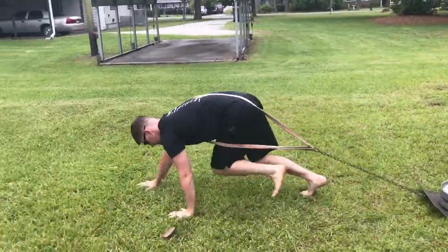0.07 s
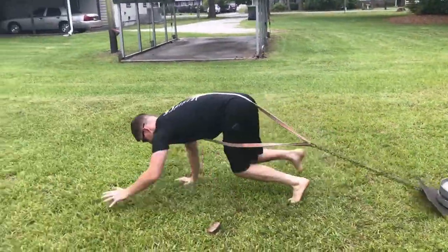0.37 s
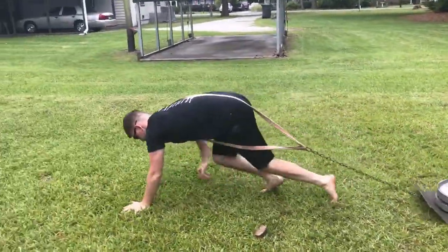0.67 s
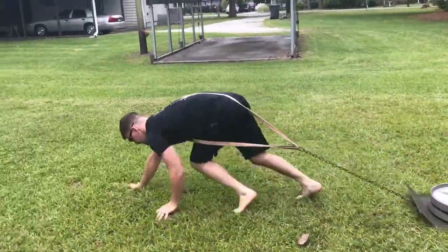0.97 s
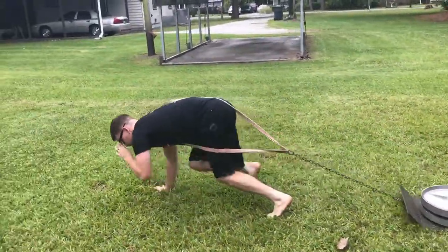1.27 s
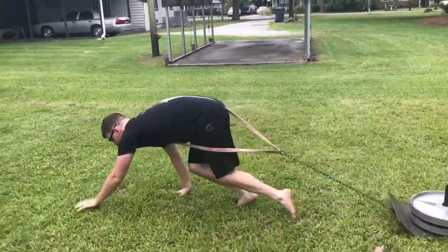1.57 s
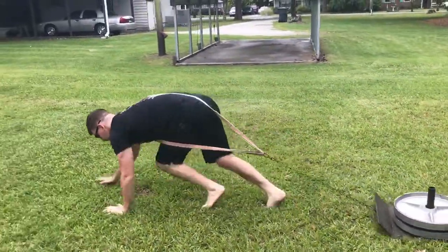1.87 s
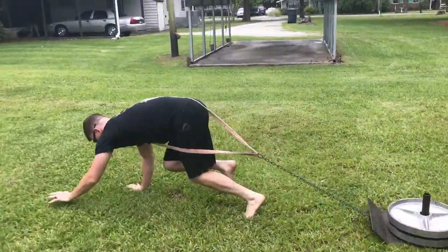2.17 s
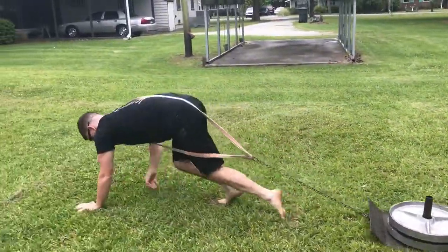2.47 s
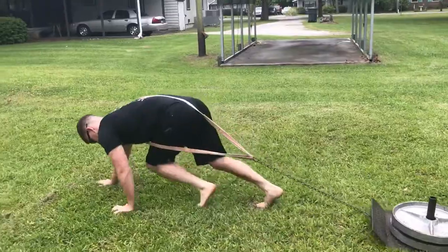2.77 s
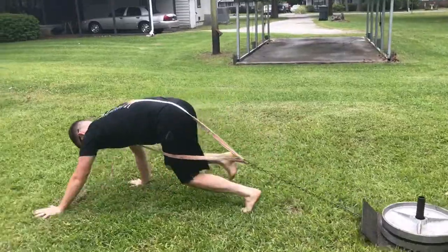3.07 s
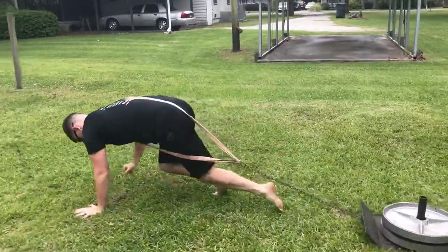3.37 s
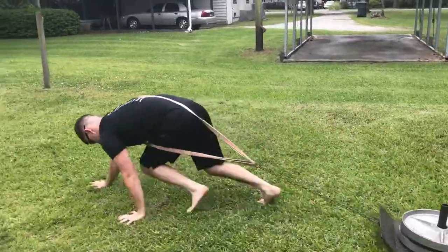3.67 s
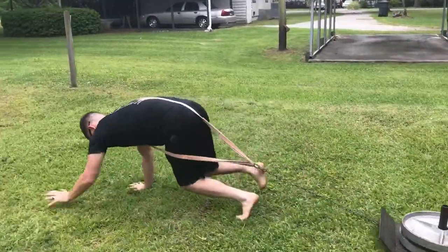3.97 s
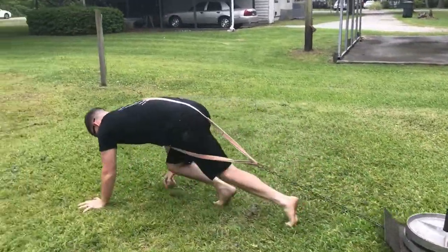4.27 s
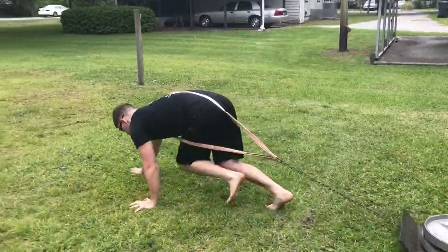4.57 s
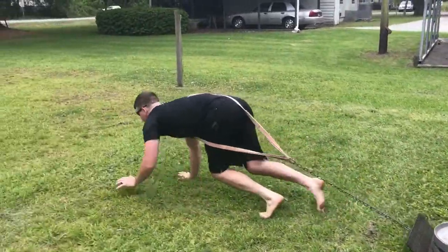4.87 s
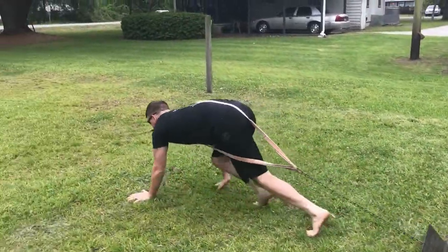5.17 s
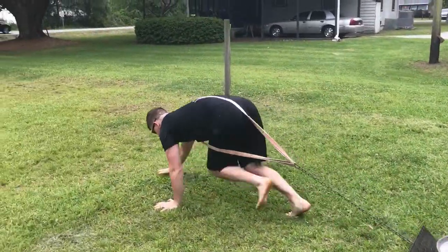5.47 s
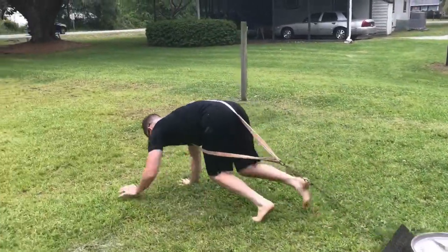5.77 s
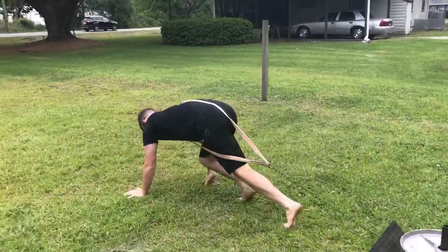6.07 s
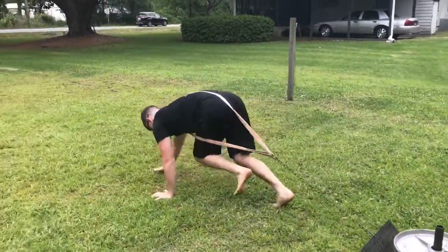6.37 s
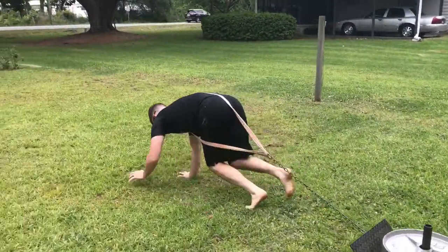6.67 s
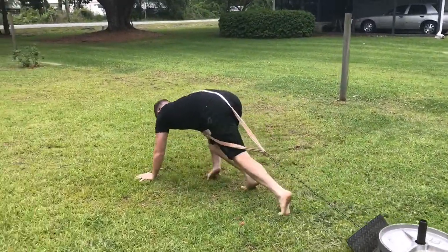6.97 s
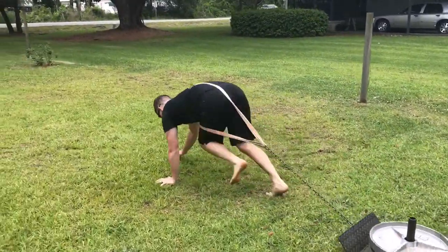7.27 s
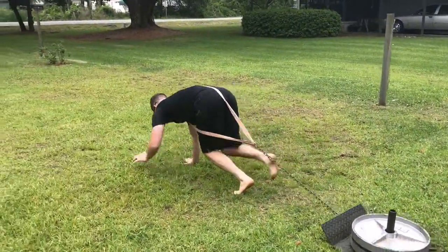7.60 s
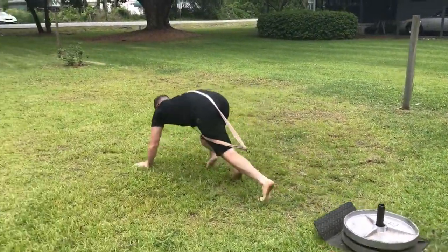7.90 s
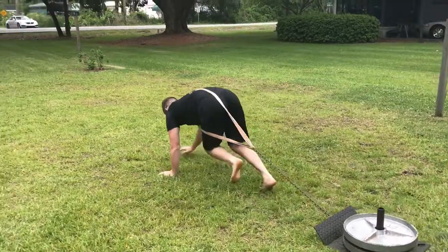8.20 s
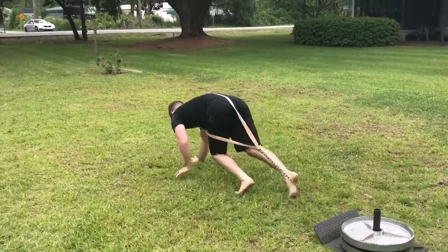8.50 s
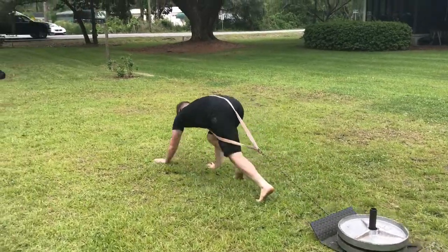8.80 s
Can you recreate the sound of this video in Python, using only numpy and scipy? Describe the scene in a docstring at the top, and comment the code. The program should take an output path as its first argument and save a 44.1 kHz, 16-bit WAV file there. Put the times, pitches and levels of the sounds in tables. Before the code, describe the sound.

Outdoors on one microphone, metal weight plates rock on a sled pulled over grass. A few light clanks sound against near quiet, then a wider wash of air, rumble and electrical hum suddenly comes in. A faint, grainy grass hiss surges with each pull, with a few tiny stem snaps. From about halfway, louder ringing clashes and clusters of soft, bouncing knocks come at uneven intervals.

```python
"""Weight sled dragged across a lawn

Outdoors, one microphone, mono. Someone crawling in a harness drags a steel sled in jerks: grass hisses under
it, and its weight plates rock with soft knocks and clash against each other and the post. Behind it the
background is faint at first, then opens up abruptly, with a rumble and a mains hum."""
import sys
import numpy as np
from scipy import signal
from scipy.fft import rfft, irfft, next_fast_len
from scipy.io import wavfile

SR = 44100
rng = np.random.default_rng(int(sys.argv[2]) if len(sys.argv) > 2 else 0)


def wav_out(sig):
    """Save sig, one row per channel (or a flat mono array), as 16-bit PCM at SR to the path in sys.argv[1]."""
    wavfile.write(sys.argv[1], SR, np.round(np.clip(np.atleast_2d(sig).T, -1, 1) * 32767).astype(np.int16))


N = 389844
RING_SIZE = SR * 2 // 5  # samples in one struck sound
TIME = np.arange(N) / SR
AGE = TIME[:RING_SIZE]  # seconds since a strike
OPENS_S, CUTOFF_HZ = 2.523, 15900


def from_db(db):
    """Decibels to gain."""
    return 10 ** (np.asarray(db) / 20)


def rms_one(x, size=None):
    """Scale so that the first size samples (or all) have rms 1."""
    return x / np.sqrt(np.mean(x[:size] ** 2) + 1e-20)


def add(out, start_s, sound):
    """Mix a sound in at start_s."""
    at = max(round(start_s * SR), 0)
    out[at:at + len(sound)] += sound[:N - at]


def band(x, low_hz, high_hz):
    """Causal band-pass."""
    return signal.sosfilt(signal.butter(3, [low_hz, high_hz], "band", fs=SR, output="sos"), x)


def coloured(spectrum, size=N):
    """Noise of rms 1 shaped by rows of freq_hz, density_db."""
    hz, db = np.transpose(spectrum)
    padded = next_fast_len(size)
    bins = np.maximum(np.fft.rfftfreq(padded, 1 / SR), 1)
    gain = from_db(np.interp(np.log(bins), np.log(hz), db)) * np.minimum(bins / hz[0], 1)
    return rms_one(irfft(rfft(rng.standard_normal(padded)) * gain, padded)[:size])


def drift(rate_hz):
    """Smooth random wander of rms 1."""
    step = 40  # samples between points
    pole = np.exp(-2 * np.pi * rate_hz * step / SR)
    slow = signal.lfilter([1], [1, -2 * pole, pole * pole], rng.standard_normal(N // step + 2002))[2000:]
    return np.interp(np.arange(N) / step, np.arange(len(slow)), rms_one(slow))


def ring(force, hz, t60_s):
    """One mode: a unit click starts a dying sine of height about 1."""
    radius, angle = np.exp(-np.log(1000) / (t60_s * SR)), 2 * np.pi * hz / SR
    return signal.lfilter([0, np.sin(angle)], [1, -2 * radius * np.cos(angle), radius ** 2], force + 1e-18)


# The faint background before it opens up: freq_hz, density_db
FAINT_AIR_SPECTRUM = [(15, -67), (25, -9), (53, 3), (92, -5), (127, -10), (175, -8), (206, -15),
                      (285, -11.5), (344, -21), (575, -11.5), (734, -28), (936, -11.5), (2350, -27),
                      (6740, -35), (16000, -38.5)]

def faint_air():
    """The low, even noise at the microphone before the background opens up."""
    return from_db(-62.04) * coloured(FAINT_AIR_SPECTRUM)


# The fuller air all around: freq_hz, density_db
OPEN_AIR_SPECTRUM = [(100, -17.5), (170, 4.5), (260, -1.5), (390, -7.5), (520, 1.5), (750, -6), (1000, -3),
                     (2000, -9), (2600, -16.5), (3300, -28.5), (8000, -42)]
# Rumble in the background: freq_hz, density_db
RUMBLE_SPECTRUM = [(20, -20), (40, 2.5), (70, 8), (95, 7), (150, -4), (300, -39.5)]
# Slow swell shared by rumble and hum: time_s, level_db
SWELL = [(2.7, -46.5), (3.09, -45), (3.25, -44.5), (4.1, -46.5), (4.87, -45.5), (6.2, -47), (6.33, -48.5),
         (8.44, -43), (8.84, -44.5)]
# Mains hum: pitch_hz, level_db (against the swell)
HUM_PARTIALS = [(60, -5), (120, -3.5)]

def open_air():
    """Wide outdoor noise over a rumble and a wavering mains hum."""
    swell_db = np.interp(TIME, *np.transpose(SWELL))
    rumble = from_db(swell_db - 1.66) * coloured(RUMBLE_SPECTRUM)
    hum = np.zeros(N)
    for hz, db in HUM_PARTIALS:
        height = np.sqrt(2) * from_db(swell_db + db + 2.0 * drift(1.6))
        hum += height * np.sin(2 * np.pi * hz * TIME + 0.64 * drift(0.42))
    air = from_db(-47.84 + 0.55 * drift(12.7)) * coloured(OPEN_AIR_SPECTRUM)
    return rumble + hum + air


# Stems breaking at ground level: start_s, level_db
STEM_SNAPS = [(4.133, -56), (4.193, -55), (4.358, -42), (4.9207, -54), (5.556, -49.5), (7.159, -56)]

def stem_snaps(decay_s, low_hz):
    """Now and then a stem snaps with a tiny bright tick."""
    out = np.zeros(N)
    for start_s, db in STEM_SNAPS:
        tick = band(rng.standard_normal(RING_SIZE) * np.exp(-AGE / decay_s), low_hz, CUTOFF_HZ)
        add(out, start_s, from_db(db) * rms_one(tick, size=SR // 500))
    return out


def clash_sizzle(relative_db, decay_s):
    """Each of the CLASHES below adds a brief burst of bright hiss; returns its gain."""
    out = np.zeros(N)
    for start_s, blow_db, *_ in CLASHES:
        add(out, start_s, from_db(blow_db + relative_db) * np.exp(-AGE / decay_s))
    return out


# The sled's speed, surging with each stride, as a relative hiss level: time_s, level_db
SLED_SPEED = [(2.55, -62), (2.74, -59), (2.86, -63.5), (2.96, -57), (3.1, -65.5), (3.4, -59), (3.51, -65),
              (4.37, -60), (4.49, -67), (4.86, -62.5), (5.09, -69), (5.69, -59.5), (5.99, -67.5),
              (6.12, -61), (6.83, -67), (7.14, -61.5), (7.19, -67.5), (7.45, -63.5), (7.7, -73.5),
              (7.94, -64), (8.37, -73), (8.4, -69)]
# Grass under the sled: freq_hz, density_db
GRASS_SPECTRUM = [(2500, -1), (4000, -11.5), (6200, -2), (7800, -8), (9200, -5.5), (10400, -10),
                  (11500, -2), (15000, -2), (16000, 2)]

def grass_hiss(speed_db, grain_db, crackles_per_s, crackle_db):
    """Countless blades brush the steel in a grainy hiss, crackling as single blades flick free."""
    flicks = (rng.random(N) < crackles_per_s / SR) * rng.random(N)
    crackle = signal.lfilter([1], [1, -np.exp(-1 / (0.00053 * SR))], flicks + 1e-18)
    hiss = coloured(GRASS_SPECTRUM) * (from_db(grain_db * drift(220)) + from_db(crackle_db) * crackle)
    # the same noise also serves as the clashes' own treble
    gain = from_db(speed_db + 6) + clash_sizzle(relative_db=-19.5, decay_s=0.012)
    return gain * rms_one(hiss)


# Strong modes of the loaded sled, also rung by the clashes: pitch_hz, relative_db, t60_s
SLED_MODES = [ (295.6, 8.5, 0.17), (320.7, 8, 0.2), (385, -16, 0.12), (573.7, -5, 0.17),
              (593.1, 4.5, 0.098), (657.7, -2.5, 0.1), (678.8, -3, 0.23), (816, -2, 0.064),
              (874.4, -1.5, 0.21), (935, 3, 0.052), (1093, -2.5, 0.11), (1167, -18, 0.41), (1447, -7, 0.17),
              (1404, 6.5, 0.32), (1672, 1, 0.03), (1720, 2, 0.051), (1733, -2, 0.13), (1869, 2.5, 0.094),
              (1922, -6, 0.27), (2125, -11.5, 0.4), (2492, 0.5, 0.14), (2490, -3, 0.11), (2700, -3, 0.11),
              (2960, -10.5, 0.17), (3150, -15, 0.14), (3540, 8.5, 0.29), (3640, -7, 0.26), (3900, 3, 0.32),
              (4380, -10.5, 0.28)]

def sled_rattle(bumps_per_s, spread_db):
    """Bumps in the lawn keep nudging the low modes of the sled; rms 1."""
    bumps = rng.random(N) < bumps_per_s / SR
    strength = from_db(spread_db * np.clip(rng.standard_normal(N), -2, 2))
    force = band(bumps * strength, 480, 970)
    return rms_one(sum((-1) ** k * from_db(db) * ring(force, hz, t60_s)
                       for k, (hz, db, t60_s) in enumerate(SLED_MODES) if hz < 1500))


def rebounds(tips, count, loss_db, gap_ratio):
    """Every tip of the stack knocks a few times, ever sooner and softer: rows of start_s, level_db."""
    return [(start_s + gap_s * sum(gap_ratio ** j for j in range(k)), db - loss_db * k)
            for start_s, db, gap_s in tips for k in range(count)]


# The stack of plates tips and rocks back: start_s, level_db, first_rebound_s
STACK_TIPS = [(0.0, -36, 0.073), (0.205, -55, .015), (0.864, -41.5, .053), (1.79, -66.5, .05),
              (2.22, -64, .05), (3.197, -30.5, 0.077), (4.946, -29.5, 0.052), (5.036, -30, .02),
              (5.44, -31.5, 0.061), (5.531, -28, 0.089), (5.846, -27, 0.011), (5.862, -25, .035),
              (6.36, -39.5, .048), (6.623, -39, 0.039), (7.374, -41.5, .051), (7.974, -30.5, 0.034),
              (8.68, -39, .03)]

def plate_knocks(pitch_hz, scatter_hz, split_hz, t60_s, thud_db):
    """A soft push wakes only a close pair of low plate modes, which swell and beat over a dull thud."""
    out, head = np.zeros(N), SR // 40
    for start_s, db in rebounds(STACK_TIPS, count=3, loss_db=7.5, gap_ratio=0.7):
        hz = pitch_hz + scatter_hz * rng.standard_normal()
        pair = np.sin(2 * np.pi * (hz + split_hz) * AGE) - 0.71 * np.sin(2 * np.pi * (hz - split_hz) * AGE)
        tone = rms_one(pair * from_db(-60 * AGE / t60_s), head)
        thud = band(rng.standard_normal(RING_SIZE), 140, 870) * np.exp(-AGE / 0.018)
        add(out, start_s, from_db(db) * (tone + from_db(thud_db) * rms_one(thud, head)))
    return out


# Plates left hanging free: start_s, pitch_hz, peak_db, t60_s
FREE_PLATES = [(.015, 1186, -39.5, 0.49), (.86, 1192, -54.5, 0.92), (5.858, 2160, -39, 0.48),
               (6.275, 2130, -52, .45), (6.772, 2480, -47.5, .35), (7.95, 2480, -38, 0.34),
               (8.445, 2135, -39, 0.41)]

def after_rings():
    """A plate that does not settle back at once sings on in one mode after the clash."""
    out = np.zeros(N)
    fade_out = np.minimum((AGE[-1] - AGE) / 0.054, 1)
    for start_s, hz, db, t60_s in FREE_PLATES:
        add(out, start_s, from_db(db - 60 * AGE / t60_s) * np.sin(2 * np.pi * hz * AGE) * fade_out)
    return out


def contact_force(chatter_s, chatter_db):
    """Steel meets steel: a first touch, then a dying chatter of tiny rebounds."""
    chatter = rng.standard_normal(RING_SIZE) * (rng.random(RING_SIZE) < 2500 / SR)
    chatter *= np.exp(-AGE / chatter_s)
    force = from_db(chatter_db) * chatter / np.sqrt(np.sum(chatter ** 2) + 1e-20)
    force[0] += 1
    return force


# Borders of seven registers (thud, knock, clang, ring, clash, edge, sheen): freq_hz
REGISTER_EDGES = [200, 480, 750, 1300, 1500, 2250, 3200, 9500]
# Weight of each register in a blow: level_db, early_db (added before the background opens up)
REGISTER_LEVELS = [(-1, -5), (11.5, -6.5), (2, 1), (6, 5.5), (-1.0, 4), (-3, -5), (-16.5, 2.5)]
# The crowd of weak, close modes between the strong ones: freq_hz, density_db
CROWD_SPECTRUM = [(200, -1), (310, 1.5), (420, -11.5), (600, 10), (760, -4.5), (900, 2.5), (1400, -6),
                  (2000, -16.5), (2500, -8), (3000, -16), (3300, -30), (4000, -28), (4300, -48),
                  (4700, -31.5), (5200, -45), (9500, -57)]
# That crowd in each register: level_db (against the strong modes), t60_s
CROWD_BY_REGISTER = [(-1.5, 0.15), (-4, 0.16), (-4.5, 0.27), (-14, 0.3), (-6, 0.13), (0.5, 0.15), (9, 0.13)]
# Thin zing from a plate's rim: pitch_hz, relative_db, t60_s
RIM_MODES = [(8595, -17, .3), (8900, -16, .33)]
# Blows in the foreground: start_s, blow_db, hardness_db_per_octave, main_ring_db, t60_factor # Where a blow
# lands sets the main ring; plates pressed together choke each other and shorten the t60. # The row at 2.521 s
# is no new blow: the 2.461 s clash sounds on as the background opens up.
CLASHES = [(0.012, -44.5, 2.5, -3.5, 0.79), (0.043, -52.5, 2.5, 5, 0.43), (0.193, -60.5, 3, -4.5, 0.51),
           (0.574, -76.5, -6, 1, .8), (0.859, -53.5, 3, -2, 0.96), (1.247, -70, -3.5, 1, 0.57),
           (2.115, -69, -4.5, 1, 0.64), (2.461, -54.5, 0, -1.5, 1.6), (2.521, -51.5, 0, 1.5, 0.64),
           (2.831, -48, -0.5, 2, .63), (3.757, -43.5, -1, 3, 0.86), (4.727, -53.5, -4, -7, 0.39),
           (4.976, -33, 0, -0.6, 1), (5.855, -32, 0, -14.5, 0.81), (6.273, -44, -1, 1, 0.9),
           (6.77, -48, -3, 7.5, 0.85), (7.948, -31, 1.4, -10.5, 0.72), (8.444, -33.5, 1.5, -1, 0.73)]

def plate_clashes(pivot_hz, main_ring_hz, crowd_rise_s, swell_cycles, yard_db, yard_t60_s, vary_db):
    """Plates hit each other and the post, ringing strong and weak modes; a harder blow is brighter."""
    out, head = np.zeros(N), SR // 25
    hz, db, t60_s = np.transpose(SLED_MODES + RIM_MODES)
    registers = list(zip(REGISTER_EDGES, REGISTER_EDGES[1:], REGISTER_LEVELS, CROWD_BY_REGISTER))
    for start_s, blow_db, hardness, ring_db, t60_factor in CLASHES:
        force = contact_force(chatter_s=0.0055, chatter_db=-4.5)
        strength = from_db(db + vary_db * rng.standard_normal(len(hz)))
        # the weak modes build up as waves cross the steel
        crowd = coloured(CROWD_SPECTRUM, size=RING_SIZE) * (1 - np.exp(-AGE / crowd_rise_s))
        for low, high, (weight_db, early_db), (crowd_db, crowd_t60_s) in registers:
            level_db = blow_db + weight_db + hardness * np.log2(low / pivot_hz)
            level_db += ring_db * (low <= main_ring_hz < high) + early_db * (start_s < OPENS_S)
            inside = np.flatnonzero((low <= hz) & (hz < high))
            modes = sum(strength[k] * ring(force, hz[k], t60_factor * t60_s[k]) for k in inside)
            # the heavy stack takes a few cycles to get moving
            swell = 1 - np.exp(-AGE * low / swell_cycles)
            strong = rms_one(band(modes * swell, low / 1.075, high), head)
            # the crowd dies fast, then the yard scatters a faint tail back to the microphone
            fade = from_db(-60 * AGE / crowd_t60_s) + from_db(yard_db - 60 * AGE / yard_t60_s)
            weak = from_db(crowd_db) * rms_one(band(crowd * fade, low, high), head)
            add(out, start_s, from_db(level_db) * rms_one(strong + weak, head))
    return out


def scene():
    """Plates in front, lawn and air behind; the sled's speed drives the hiss and, slightly, the rattle."""
    speed_db = np.interp(TIME, *np.transpose(SLED_SPEED))
    hiss = grass_hiss(speed_db, grain_db=0.5, crackles_per_s=20, crackle_db=13.5)
    rattle = sled_rattle(bumps_per_s=130, spread_db=4.0)
    uneven_ground_db = 3 * drift(1.0)
    rattle_db = -53.5 + 0.05 * (speed_db - speed_db.mean()) + uneven_ground_db
    full = open_air() + hiss + from_db(rattle_db) * rattle
    faint = faint_air() + from_db(-74.5) * rattle
    opened = np.clip((TIME - OPENS_S) / 0.0084, 0, 1)
    clashes = plate_clashes(pivot_hz=750, main_ring_hz=1400, crowd_rise_s=0.0025, swell_cycles=2.2,
                            yard_db=-24, yard_t60_s=0.54, vary_db=5.0)
    knocks = plate_knocks(pitch_hz=580.2, scatter_hz=7.5, split_hz=15.7, t60_s=0.17, thud_db=-14.5)
    snaps = stem_snaps(decay_s=0.00096, low_hz=2800)
    return (1 - opened) * faint + opened * full + snaps + knocks + after_rings() + clashes


def record(dry):
    """The microphone signal, with the highest treble cut steeply."""
    return signal.sosfilt(signal.ellip(12, .1, 80, CUTOFF_HZ, fs=SR, output="sos"), dry)


dry = scene()
out = record(dry)
wav_out(out)
```